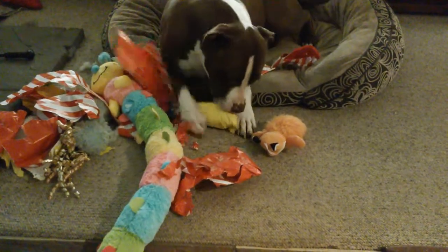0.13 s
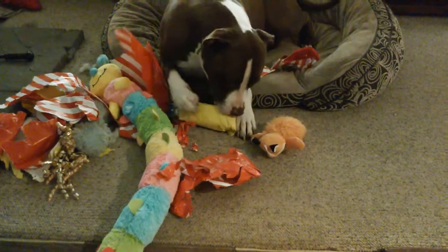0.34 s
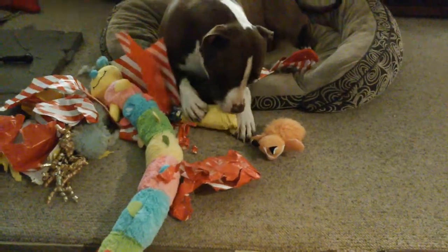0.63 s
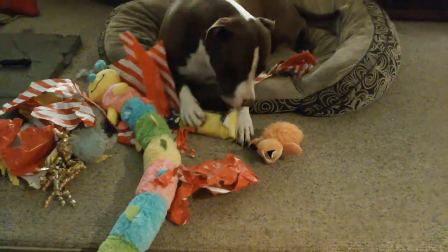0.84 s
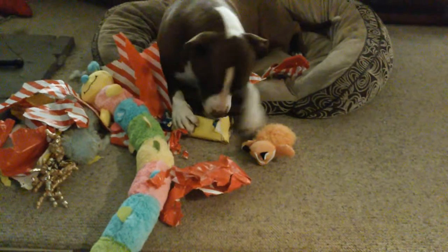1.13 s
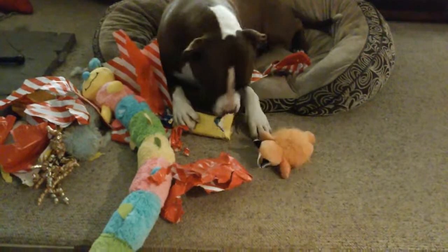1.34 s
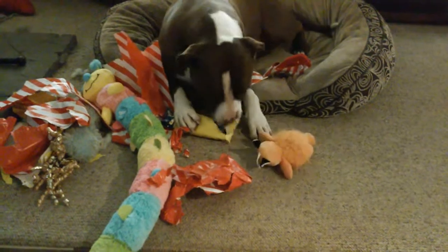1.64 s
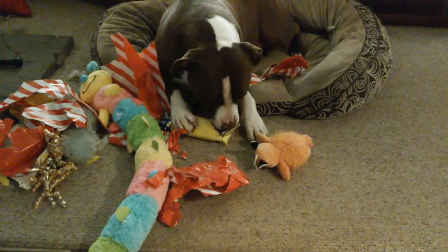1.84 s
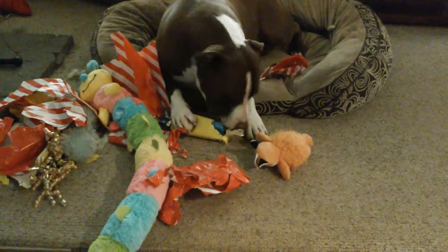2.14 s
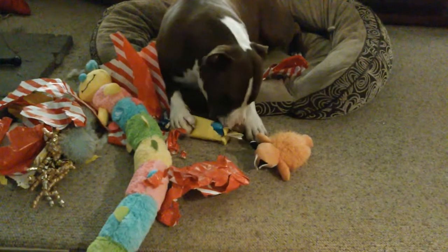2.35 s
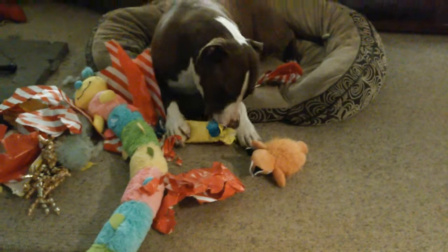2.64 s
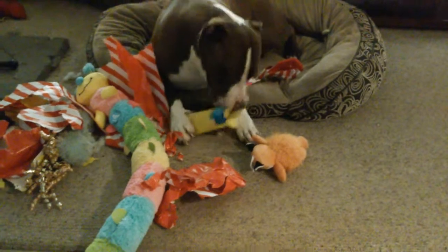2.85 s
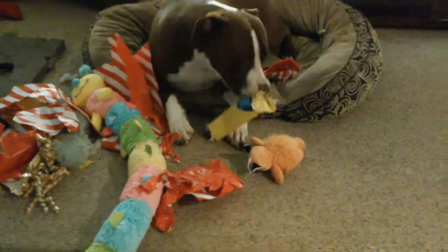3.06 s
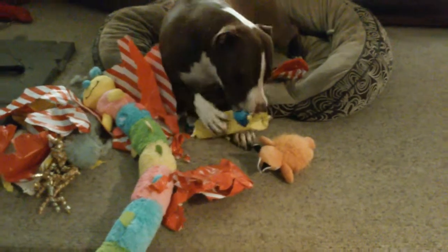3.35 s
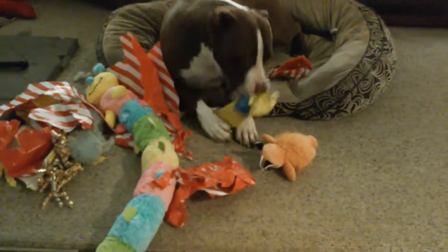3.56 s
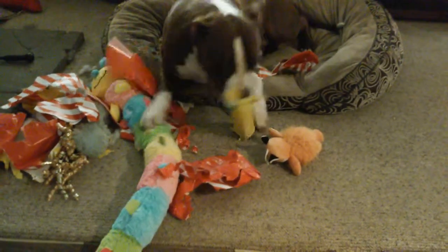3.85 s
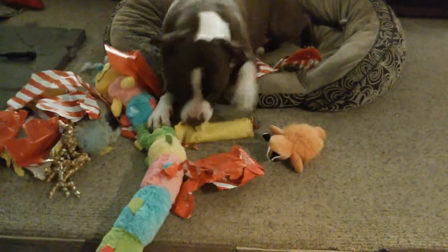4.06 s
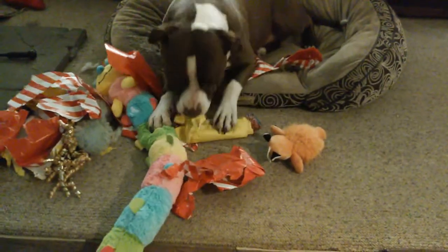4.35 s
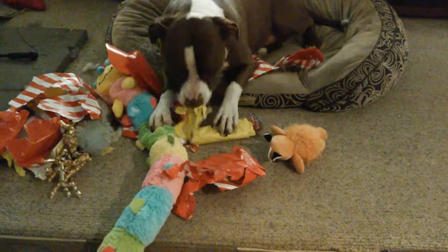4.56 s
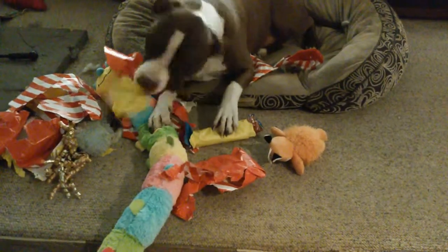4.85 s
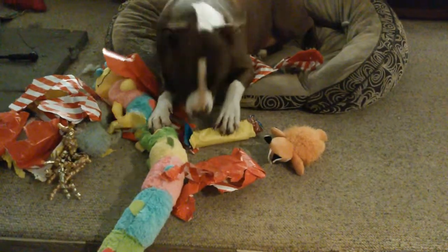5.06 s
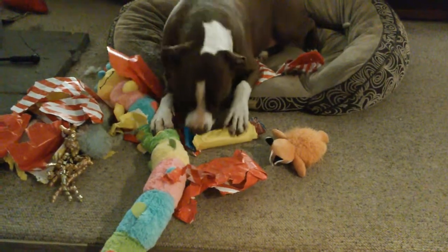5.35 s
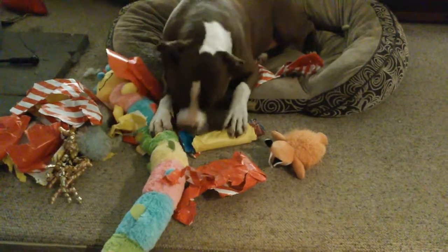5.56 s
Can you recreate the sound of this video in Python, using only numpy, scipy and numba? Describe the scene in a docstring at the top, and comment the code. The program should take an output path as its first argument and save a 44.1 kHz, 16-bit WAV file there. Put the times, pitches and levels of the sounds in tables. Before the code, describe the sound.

A dog tears at wrapping paper on a carpet. It opens with sharp paper snaps, loudest at about 0.2 seconds, along with a flap of the sheet and a soft thud. A smaller burst of crinkling follows just before 1 second. From there to about 2.4 seconds there is only light rustling with scattered little crackles. The paper then picks up, and from about 3 to 4.8 seconds it is crumpled and ripped busily in quick tugs, full of crisp snapping creases. Between 4 and 4.8 seconds the parcel and paws land on the carpet with several dull, low knocks. After that the sound falls away to faint crinkles, ending at around 5.5 seconds. Everything is heard from a couple of metres above, with the short echo of a small furnished room and a faint steady hiss.

```python
"""Sharp snaps of gift paper come first, then light rustling that builds to a busy crumple and fades:
a dog is tearing the sheet on a carpet, a couple of metres below the microphone. Creases buckle and
ring, singly and in swarms, fibres rip, the sheet flaps, and the parcel and paws thud.
The floor and a small furnished room echo it all over a faint microphone hiss."""
import sys
import numpy as np
from scipy import signal
from scipy.fft import rfft, irfft
from scipy.io import wavfile
from numba import njit

SR = 44100
rng = np.random.default_rng(int(sys.argv[2]) if len(sys.argv) > 2 else 0)


def waveform_to_disk(signal):
    """Save audio, clipped to [-1, 1], as 16-bit WAV at the path in sys.argv[1]."""
    frames = np.transpose(np.atleast_2d(signal))
    scaled = np.clip(frames, -1, 1) * 32767
    samples = np.round(scaled).astype(np.int16)
    wavfile.write(sys.argv[1], SR, samples)


N = 251370

# tone of the microphone hiss: f/Hz, relative level/dB
HISS_EQ = [(18, -40.5), (30, -6), (480, -3.5), (547, -7), (1000, -4.5), (14800, -16), (16500, -13.5)]
# tone of the air path and the microphone: f/Hz, gain/dB
MIC_EQ = [(25, -18), (50, -13), (520, -3), (600, -5), (780, -2.5), (1010, -8.5), (1150, -0.5), (2100, 1),
          (3900, 2.5), (5500, 2), (7100, 5.5), (9800, -9.5), (13900, -7), (16500, -15.5)]
# early reflections off floor and furniture: delay/s, level/dB
REFLECTIONS = [(.0025, -14), (.0052, -14.5), (0.0087, -32)]
# decay of the room tail by band: f/Hz, t60/s
ROOM_DECAY = [(150, 0.36), (600, 0.35), (2000, 0.26), (6000, 0.27), (13000, 0.094)]
# parcel and paws landing on the carpet: t/s, level/dB, f/Hz
CARPET_THUDS = [(0.217, -19.5, 366), (0.262, -28.5, 530), (0.771, -37, 413), (2.854, -31.5, 107),
                (2.966, -27, 223), (3.897, -26, 456), (4.083, -17.5, 560), (4.199, -17.5, 388),
                (4.247, -26, 378), (4.41, -27, 271), (4.436, -24, 250), (4.605, -16, 534),
                (4.643, -13, 211), (4.663, -21, 262), (4.74, -25, 190), (4.772, -23, 222)]
# bites, tugs and paw strokes on the sheet:
# t/s at full strength, rise/s, hold/s, crease level/dB, rip re crease/dB, flap re crease/dB
PAPER_TUGS = [(0.0, .01, 0.045, -61.5, -6.5, 1), (0.071, 0.0058, 0.029, -37.5, -6.5, -5),
              (0.201, 0.053, .015, -24.5, -8, 1), (0.237, 0.039, 0.048, -48, -5, 12),
              (0.41, 0.18, .005, -60, -4, 5), (0.534, 0.047, 0.0032, -49, -7, -7.5),
              (0.59, 0.0067, 0.0033, -49.5, -5.5, -12), (0.716, 0.16, 0.0082, -49, -2.5, -5),
              (0.769, 0.0067, 0.043, -33, -2, -4.5), (0.825, 0.049, 0.056, -36.5, -5.5, -10),
              (0.897, 0.018, 0.019, -33.5, -1.5, -11), (1.174, 0.067, 0.015, -49.5, -15, -40),
              (1.268, .04, 0.0048, -54.5, -5.5, -9), (1.685, 0.038, 0.093, -52, -2.5, -11),
              (1.87, .04, 0.0067, -62, -17, -3), (2.304, 0.1, 0.011, -66.5, -10, -29),
              (2.408, 0.02, 0.018, -59, -9, -24), (2.475, 0.0045, 0.071, -49, -4, -29),
              (2.593, 0.019, 0.12, -48, -12.5, -18.5), (2.722, 0.079, 0.0045, -36.5, -11, -23),
              (2.779, 0.016, 0.26, -46, -4, -9.5), (2.938, 0.0098, .17, -30, -8.5, -18.5),
              (3.149, 0.044, 0.13, -33, -10.5, -31.5), (3.235, 0.088, 0.0039, -30, -8.5, -12.5),
              (3.309, 0.055, 0.016, -34.5, -8.5, -6), (3.386, 0.037, 0.007, -31.5, -6, -5),
              (3.467, 0.01, 0.0032, -31, -7, -15.5), (3.55, 0.06, 0.14, -37, -4, -6.5),
              (3.715, .05, 0.017, -51.5, -4.5, -7.5), (3.813, 0.0055, 0.13, -32, -4.5, -30),
              (3.883, 0.3, 0.064, -36.5, -6.5, -4.5), (4.013, 0.029, 0.011, -35.5, -7.5, -19.5),
              (4.078, 0.12, 0.006, -27.5, -10.5, -6), (4.138, 0.054, 0.0034, -34, -6.5, -26.5),
              (4.198, .015, 0.002, -21.5, -5.5, -2), (4.236, 0.03, 0.067, -40, -17, 3.5),
              (4.454, 0.18, 0.0078, -30, -8, -4), (4.584, 0.09, 0.072, -28.5, -7, -6.5),
              (4.765, 0.25, 0.0031, -31.5, -6, 0), (4.843, .02, 0.21, -63, -1, -2.5),
              (5.116, 0.009, 0.067, -73.5, 4, -16), (5.193, 0.018, 0.061, -69.5, 1.5, -1)]
# bend of the creases' top pitch, lower while the paper is balled in the mouth: t/s, shift/octaves
CREASE_BEND = [(0, -0.056), (.3, -0.38), (.7, -0.51), (.95, 0), (1.2, 0.24), (1.8, -0.4), (2.4, 0.28),
               (2.75, .1), (2.95, -.3), (3.07, -0.68), (3.25, -.9), (3.35, -0.085), (3.6, -0.36),
               (3.85, -.4), (4.1, -.4), (4.45, -.4), (4.75, -.5), (5.2, -.1)]
# single creases giving way: t/s, level/dB, f/Hz, bright tick re ring/dB
CREASE_SNAPS = [(0.019, -38.5, 1970, -14.5), (0.074, -14.5, 1360, -5), (0.168, -22, 1130, -15),
                (0.194, -15.5, 1560, -16), (0.204, -18, 1530, -16), (0.225, -8.5, 1740, -19),
                (0.281, -21.5, 1750, -31.5), (0.389, -31.5, 1080, -8), (0.422, -35, 3260, -7),
                (0.501, -47.5, 1310, 0), (0.524, -33, 1600, -15), (0.543, -29.5, 1420, -43),
                (0.599, -31, 1460, -20), (0.683, -35, 1610, -2), (0.734, -35, 1430, -27),
                (0.763, -24, 1480, -18), (0.772, -21, 1490, -18), (0.855, -23, 2610, -19),
                (0.897, -20.5, 3070, 1), (0.909, -20, 1950, -19), (0.929, -18, 2400, -14),
                (1.127, -34, 1350, -4), (1.147, -56, 1340, 10), (1.165, -28, 1420, -3),
                (1.169, -29.5, 4340, -11), (1.181, -39, 1560, -23), (1.209, -26, 2350, -40),
                (1.254, -45, 1730, -14), (1.27, -31.5, 1330, -19), (1.369, -54.5, 2480, 9.5),
                (1.607, -51.5, 1150, -5), (1.643, -47, 2430, -6), (1.667, -36, 1580, -0.5),
                (1.684, -27.5, 1570, -11), (1.753, -52, 1770, -5), (1.775, -32, 1960, -25),
                (1.868, -28, 1430, -8), (1.962, -40.5, 3270, -2), (2.262, -49, 2180, 0.5),
                (2.3, -49.5, 2370, 6), (2.311, -41.5, 1350, -24), (2.397, -48, 1590, -10),
                (2.416, -42, 1310, -21), (2.477, -19.5, 2550, -12.5), (2.51, -29.5, 1380, -6),
                (2.518, -35, 1740, -10), (2.596, -23, 1420, -14.5), (2.633, -38.5, 1370, 15),
                (2.658, -33.5, 740, -6), (2.687, -28, 1550, -5), (2.72, -22, 3250, -20.5),
                (2.728, -21, 2340, -32), (2.746, -32.5, 3250, -13), (2.79, -25, 1630, -3),
                (2.836, -21, 1430, -7), (2.875, -28, 2330, -8), (2.92, -39, 1570, -20.5),
                (2.944, -18.5, 1180, -39), (2.997, -8.5, 1870, 0), (3.023, -16.5, 796, -18.5),
                (3.057, -21, 1400, -24), (3.071, -11, 1270, -15.5), (3.082, -14.5, 1280, -8),
                (3.107, -8.5, 1670, -12), (3.157, -25.5, 1330, 5), (3.215, -17, 1200, -16),
                (3.224, -16, 813, -16), (3.312, -24.5, 1180, 10), (3.368, -12, 1820, -13),
                (3.388, -11.5, 1810, -10), (3.418, -19.5, 1870, -31), (3.469, -11, 1670, -12),
                (3.517, -28.5, 1740, -16), (3.548, -22.5, 1590, -11), (3.571, -21.5, 1980, -13),
                (3.59, -14, 1420, -4.5), (3.606, -14.5, 1360, -18), (3.649, -16, 2200, -16.5),
                (3.656, -14, 2090, -9.5), (3.747, -32, 1570, -6.5), (3.812, -11, 1660, -2.5),
                (3.835, -18, 1340, -22), (3.846, -16.5, 2050, -22), (3.854, -3, 2120, -12),
                (3.868, -17.5, 2180, -11.5), (3.885, -7.5, 1770, -10.5), (3.898, -11.5, 1890, -21),
                (3.917, -16.5, 2080, -7.5), (3.943, -22.5, 1560, -11), (3.952, -26.5, 1270, -6),
                (4.024, -20.5, 1170, -13.5), (4.064, -10, 2100, -25), (4.079, -11, 673, -14),
                (4.12, -29.5, 740, -10.5), (4.195, -8, 1540, -9.5), (4.2, -14, 1690, -1.5),
                (4.212, -8.5, 1530, -28), (4.248, -25.5, 1330, 2), (4.303, -22.5, 1420, -34.5),
                (4.342, -22.5, 1650, -6), (4.37, -17.5, 1400, -3.5), (4.407, -43.5, 1320, -17.5),
                (4.437, -19.5, 880, -24.5), (4.46, -16.5, 2080, -11), (4.475, -19.5, 2080, -27.5),
                (4.514, -24, 1220, -26), (4.545, -18, 1450, -25), (4.576, -8, 2120, -15),
                (4.603, -12.5, 2020, 4), (4.619, -27, 2100, -23), (4.641, -13, 2060, -22),
                (4.72, -22, 1560, 8), (4.759, -15.5, 1730, -20), (4.841, -30.5, 1850, -19),
                (4.901, -38.5, 1890, 3), (4.971, -32.5, 2150, 4), (5.005, -42, 1170, -21),
                (5.124, -44, 2270, 5), (5.132, -32.5, 4300, -3), (5.166, -37.5, 2370, -16),
                (5.217, -41.5, 2030, -6), (5.241, -48.5, 1280, -2), (5.301, -39.5, 1410, -27),
                (5.369, -45, 1300, -12), (5.502, -50, 1730, -5.5), (5.545, -49.5, 1490, 5)]

# grain swarms: grains a second, pitch range (creases: before the bend), ring length, share of SCATTER_DB
FLAP = dict(rate=570, lo_hz=91.5, hi_hz=730, cycles=2, scatter=.8)
SPARKLE = dict(rate=260, lo_hz=9000, hi_hz=15500, cycles=4.5, scatter=.9)
FIBRE = dict(rate=3600, lo_hz=3000, hi_hz=15500, cycles=3.0, scatter=.88)
CREASE = dict(rate=1800, lo_hz=681.4, hi_hz=4200, cycles=6.6, scatter=.71)
SCATTER_DB, BUCKLES_PER_S = 8.5, 4000  # spread of grain sizes; pool of moments the swarms pick from


def undb(db):
    """Gain of a dB value."""
    return 10 ** (np.asarray(db) / 20)


def equalise(x, points):
    """Minimum-phase EQ through points of f/Hz, gain/dB."""
    hz, db = np.transpose(points)
    grid = np.linspace(1, SR / 2, num=2049)
    cepstrum = irfft(np.interp(np.log(grid), np.log(hz), db) * np.log(10) / 20)
    cepstrum[1:2048] *= 2
    cepstrum[2049:] = 0
    return signal.fftconvolve(x, irfft(np.exp(rfft(cepstrum))))[:len(x)]


@njit
def sum_rings(length, start, hz, cycles, size, phase):
    """Each grain swells over one cycle, then dies to 1/e in cycles / 2 cycles."""
    out = np.zeros(length)
    fall = 2 / cycles
    for k in range(len(start)):
        step = hz[k] / SR
        for i in range(min(int((1 + 6 / fall) / step), length - start[k])):
            turn = step * i
            envelope = np.sin(np.pi / 2 * turn) ** 2 if turn < 1 else np.exp(-fall * (turn - 1))
            out[start[k] + i] += size[k] * envelope * np.sin(2 * np.pi * turn + phase[k])
    return out


def rings(when, hz, size, cycles):
    """Short damped tones, each kicked off with a push or a pull."""
    phase = np.pi * rng.integers(0, 2, len(when))
    return sum_rings(N, (when * SR).astype(np.int64), np.clip(hz, 20, .45 * SR), cycles, size, phase)


def swarm(buckles, rate, lo_hz, hi_hz, cycles, scatter):
    """A grain cloud at rms 1; swarms partly share moments and sizes, so they crackle together."""
    when, rank, strength = buckles
    hz = lo_hz * (hi_hz / lo_hz) ** rng.random(len(when))
    spread = scatter * (.63 * strength + .66 * rng.standard_normal(len(when)))
    size = undb(SCATTER_DB * np.clip(spread, -3, 2.3)) * (rank < rate)
    size *= np.sqrt(hz / lo_hz)  # short high rings carry less energy, so they start larger
    grains = rings(when, hz, size, cycles)
    return grains / grains.std()


def microphone_hiss(level_db=-73.5):
    """A faint, steady bed of microphone noise."""
    hiss = equalise(rng.standard_normal(N), HISS_EQ)
    return hiss / hiss.std() * undb(level_db)


def room(x, tail_db=-10, predelay_s=.002):
    """Close reflections off floor and furniture, then a short tail whose treble dies first."""
    t = np.arange(SR // 2) / SR
    tail = 0
    for hz, t60 in ROOM_DECAY:
        band = signal.butter(1, [hz / 2, min(hz * 3.1, .45 * SR)], "bandpass", fs=SR, output="sos")
        tail += signal.sosfilt(band, rng.standard_normal(len(t))) * undb(-60 * t / t60)
    tail *= np.clip(t / predelay_s - 1, 0, 1)
    response = tail * undb(tail_db) / np.sqrt(np.sum(tail ** 2))
    response[0] = 1  # direct sound
    for delay, db in REFLECTIONS:
        response[int(delay * SR)] += undb(db)
    return signal.fftconvolve(x, response)[:N]


def floor_rumble(flap, cutoff_hz=75, re_flap_db=-22.5):
    """The dog's weight shakes the floor while the sheet flaps."""
    lowpass = signal.butter(2, cutoff_hz, fs=SR, output="sos")
    shake = signal.sosfilt(lowpass, rng.standard_normal(N))
    return shake / shake.std() * flap * undb(re_flap_db)


def carpet_thuds():
    """Parcel and paws land on the carpet with soft, low knocks."""
    when, db, hz = np.transpose(CARPET_THUDS)
    return rings(when, hz, undb(db), cycles=5)


def tug_envelopes(rise_db=30, release_db_per_s=452):
    """Gains of creasing, ripping and flapping: every tug swells, holds and lets go."""
    t = np.arange(N) / SR
    power = 0
    for when, rise, hold, db, rip_db, flap_db in PAPER_TUGS:
        attack = np.minimum(rise_db * (t - when) / rise, 0)
        release = release_db_per_s * np.maximum(t - when - hold, 0)
        level_db = np.maximum(db + attack - release, -150)
        power += undb(2 * level_db) * undb([[0], [rip_db], [flap_db]]) ** 2
    return np.sqrt(power)


def crumple(crease, rip, flap, sparkle_db=-4.5):
    """The sheet buckles: low flaps, midrange creases, bright rips, a sparkle of the thinnest fibres."""
    count = int(BUCKLES_PER_S * N / SR)
    when = np.sort(rng.random(count)) * N / SR
    rank = BUCKLES_PER_S * rng.random(count)  # a swarm plays the buckles ranked below its rate
    strength = rng.standard_normal(count)
    buckles = when, rank, strength
    top_hz = CREASE["hi_hz"] * 2 ** np.interp(when, *np.transpose(CREASE_BEND))
    creases = swarm(buckles, **dict(CREASE, hi_hz=top_hz)) * crease
    fibres = swarm(buckles, **FIBRE) * rip
    flaps = swarm(buckles, **FLAP) * flap
    sparkle = swarm(buckles, **SPARKLE) * rip * undb(sparkle_db)
    return creases + fibres + flaps + sparkle


def stray_crackle(crease, per_s=60, pool_per_s=200, centre_hz=1360):
    """Creases snap at random moments, riding the level of the creasing around them."""
    position, rank = rng.random((2, int(pool_per_s * N / SR)))
    strength, pitch, brightness = np.clip(rng.standard_normal((3, len(position))), -2, 2)
    fires = rank * pool_per_s < per_s
    size = crease[(position * N).astype(int)] * undb(7 + 2 * strength) * fires
    return snaps(position * N / SR, size, centre_hz * np.exp(.3 * pitch), tick_db=-6 + 6 * brightness)


def snaps(when, size, hz, tick_db, patch_cycles=3.26, side_db=-8.5, tick_hz=7560, fibre_hz=13000):
    """A crease gives way: three patches of paper ring, the edge ticks, the thinnest fibres break."""
    low, high = rng.random((len(when), 2)).T
    side_size, tick_size = size * undb(side_db), size * undb(tick_db)
    body = rings(when, hz, size, patch_cycles)
    body += rings(when, hz * (.45 + .35 * low), side_size, patch_cycles)
    body += rings(when, hz * (1.5 + .6 * high), side_size, patch_cycles)
    fibres = rings(when, np.full(len(when), fibre_hz), tick_size * undb(2.5), cycles=3.5)
    detune = np.exp(.17 * rng.standard_normal(len(when)))
    tick = rings(when, tick_hz * detune, tick_size, cycles=6.4)
    return body + fibres + tick


def scene():
    """Paper up front, thuds and rumble underneath, all through the room."""
    crease, rip, flap = tug_envelopes()
    texture = crumple(crease, rip, flap) + floor_rumble(flap) + stray_crackle(crease)
    when, db, hz, tick_db = np.transpose(CREASE_SNAPS)
    accents = snaps(when, undb(db), hz, tick_db)
    return room(texture + accents + carpet_thuds())[None]


def record(dry, offset_db=-69.5, ceiling_db=3):
    """The microphone colours the sound, adds its hiss, rounds the peaks and cuts the top."""
    x = equalise(dry[0], MIC_EQ) + microphone_hiss()
    x -= undb(offset_db)  # steady offset of the converter
    x = undb(ceiling_db) * np.tanh(x / undb(ceiling_db))
    x = equalise(x, [(20, 0), (15900, 0), (16100, -22)])
    high_cut = signal.ellip(10, .2, 60, 16700, fs=SR, output="sos")
    return signal.sosfilt(high_cut, x)[None]


dry = scene()
out = record(dry)
waveform_to_disk(out)
```